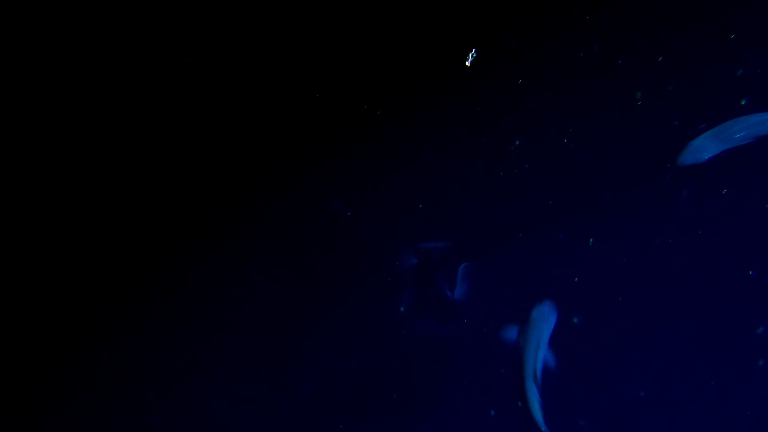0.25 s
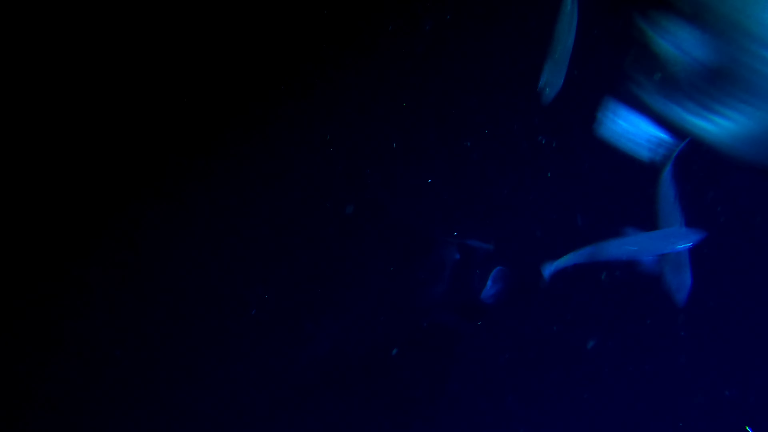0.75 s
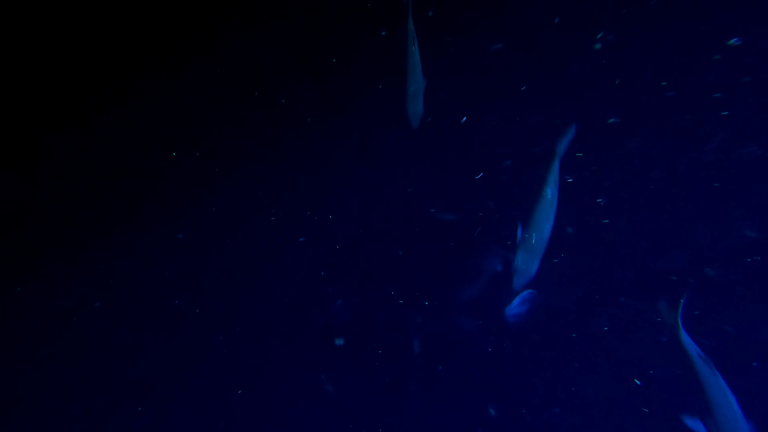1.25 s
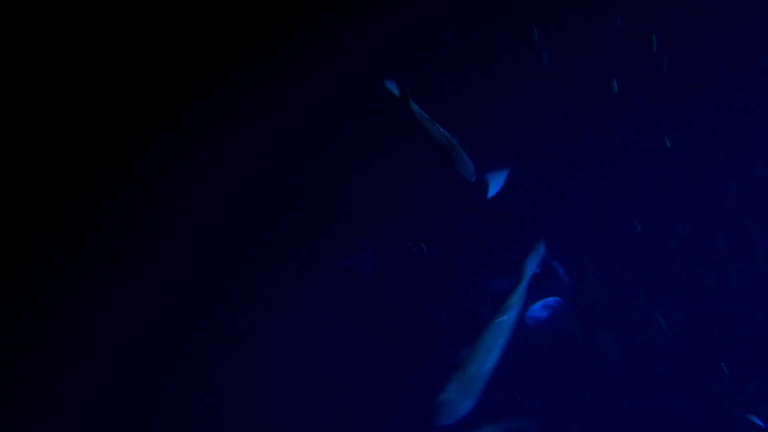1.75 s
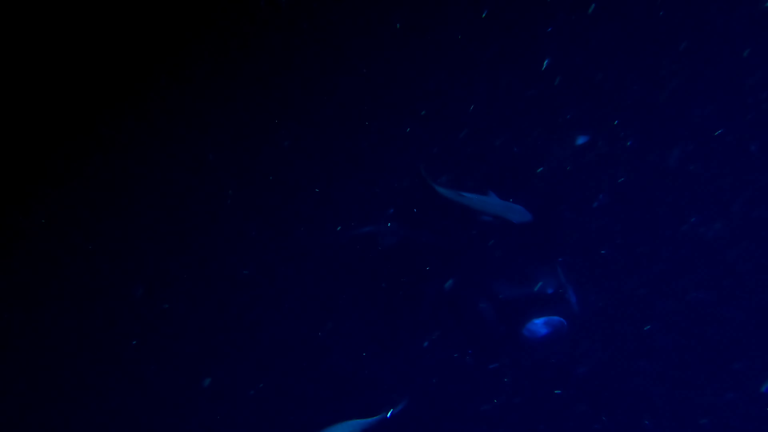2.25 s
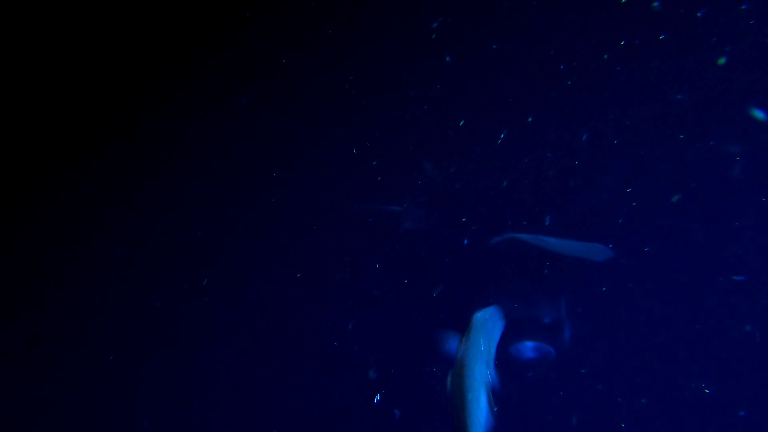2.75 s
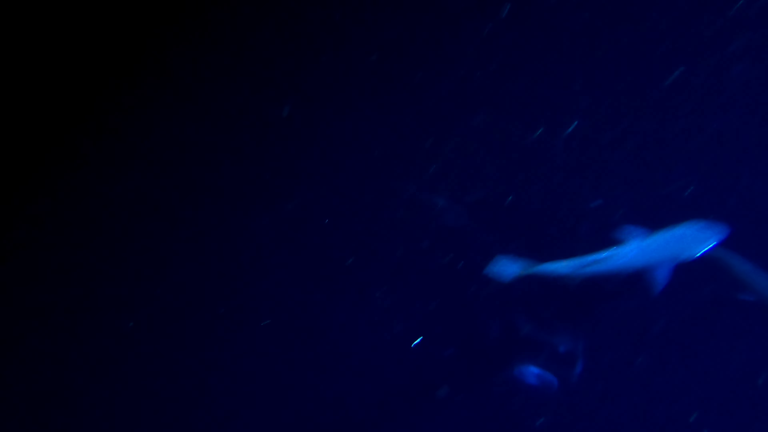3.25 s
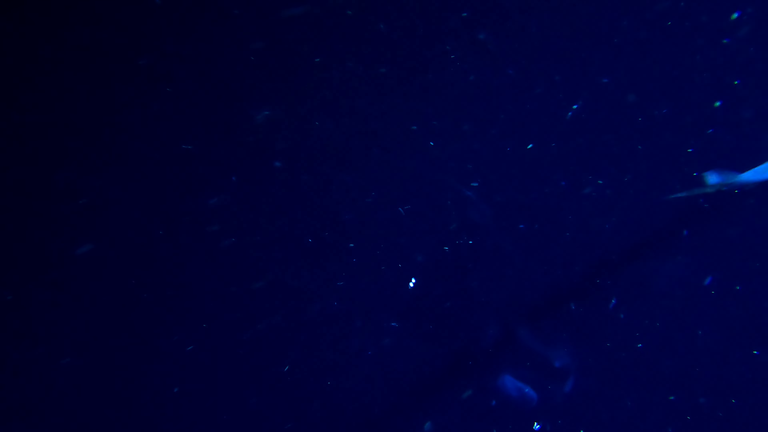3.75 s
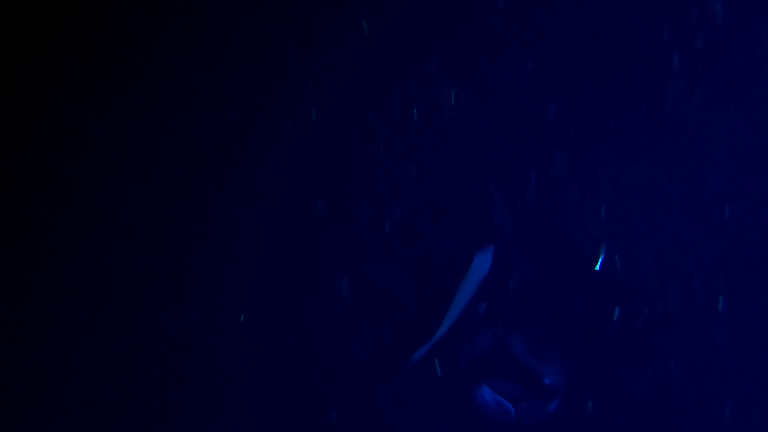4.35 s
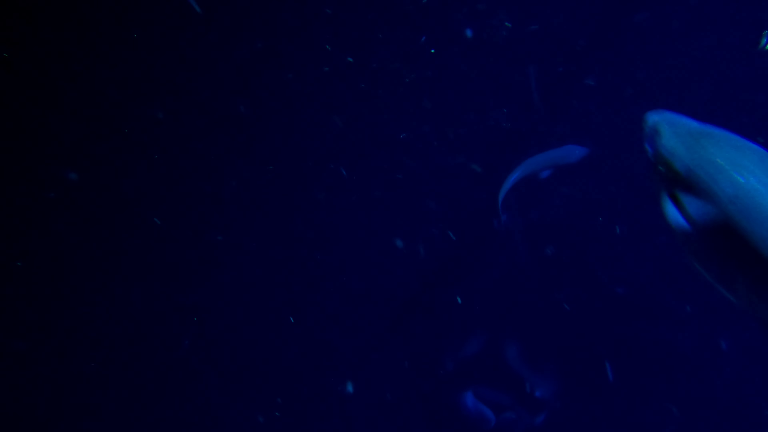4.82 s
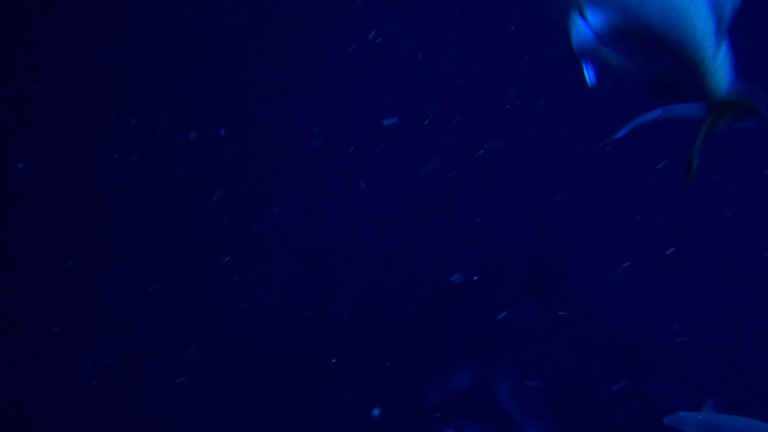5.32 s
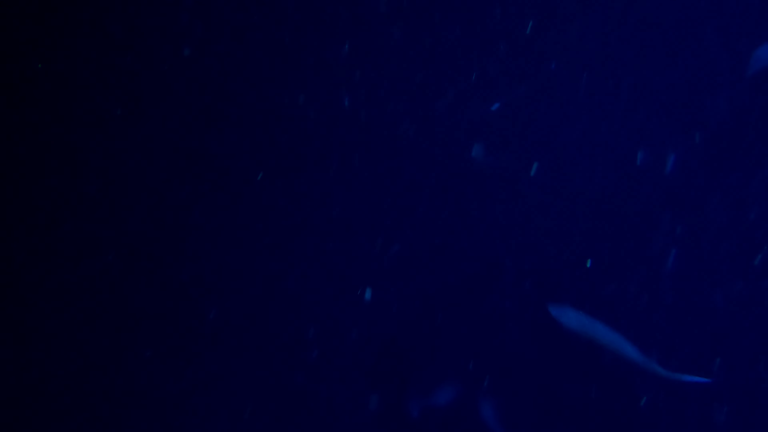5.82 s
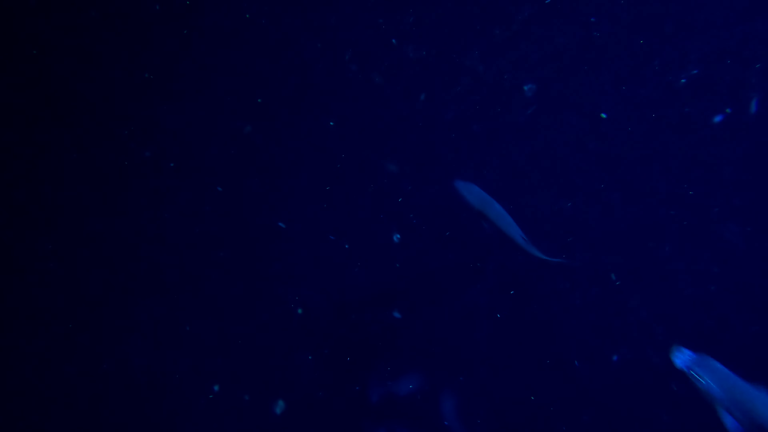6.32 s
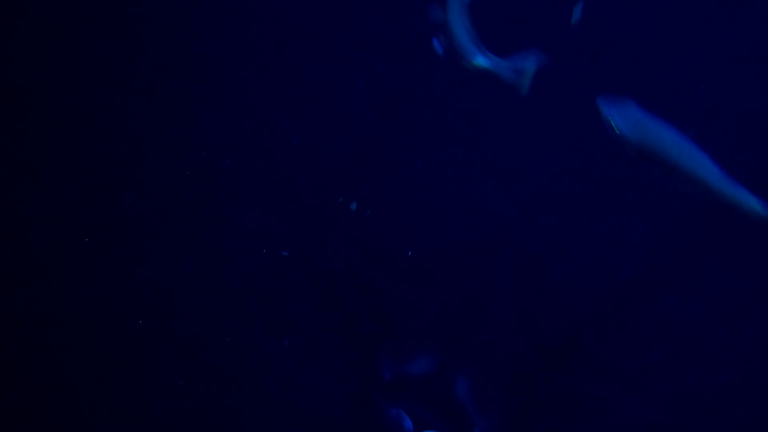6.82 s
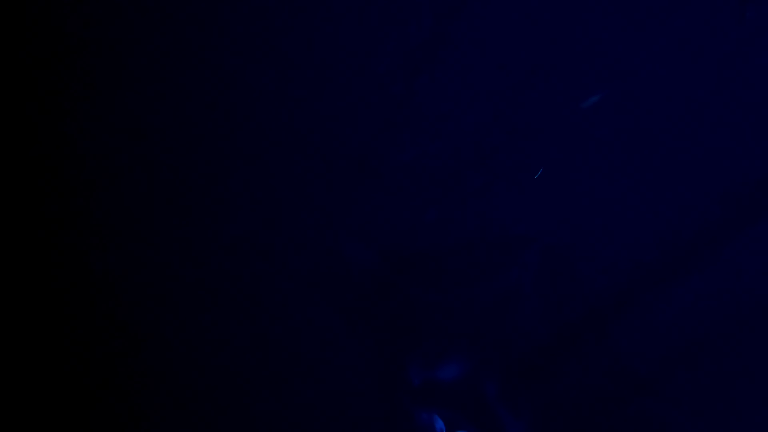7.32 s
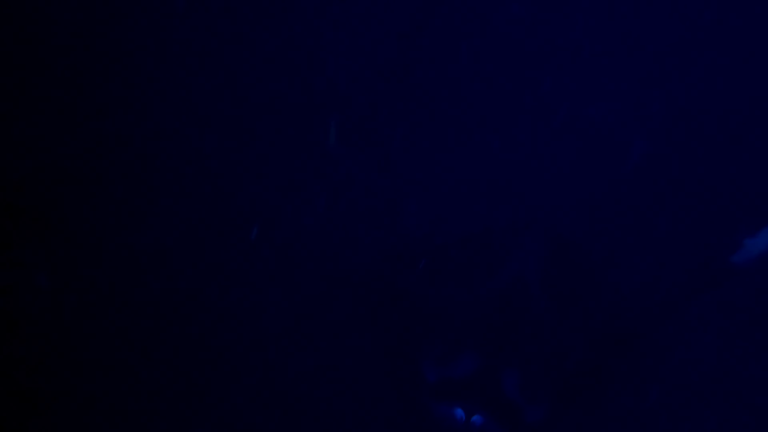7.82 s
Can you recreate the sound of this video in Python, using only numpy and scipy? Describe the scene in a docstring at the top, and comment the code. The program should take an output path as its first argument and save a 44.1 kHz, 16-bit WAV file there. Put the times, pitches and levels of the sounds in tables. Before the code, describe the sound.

Muffled motor drone and rushing wash beneath the sea, bubbles glugging past, then the engine's throbbing fizz turns brighter, hollow and wide.

```python
"""Boat engines heard under water by a diving camera: a drifting hum, a beating upper tone and fine clatter.
The hum is a sine on its own pitch path; overtones, whine and clatter are sines locked to the crank.
Shaped noise gives the steady propeller wash, the throbbing fizz, the hull drone and the rumble at the housing.
Bubbles glug and gurgle as short gliding tones; faint clicks, bursts of band noise, dot the treble.
After about 4.8 s the dull mono sound opens into a brighter, hollow stereo ring."""
import sys
import numpy as np
from scipy import signal
from scipy.fft import rfft, irfft, next_fast_len
from scipy.io import wavfile
from scipy.ndimage import uniform_filter1d, map_coordinates

SR = 44100
rng = np.random.default_rng(int(sys.argv[2]) if len(sys.argv) > 2 else 0)


def waveform_to_disk(signal):
    """Save audio, clipped to [-1, 1], as 16-bit WAV at the path in sys.argv[1]."""
    frames = np.transpose(np.atleast_2d(signal))
    scaled = np.clip(frames, -1, 1) * 32767
    samples = np.round(scaled).astype(np.int16)
    wavfile.write(sys.argv[1], SR, samples)


N = 356328
T = np.arange(N) / SR  # time [s]


def amp(db):
    """Decibels to gain."""
    return 10 ** (np.asarray(db) / 20)


def unit(x):
    """Scale to rms 1."""
    return x / np.sqrt(np.mean(x ** 2) + 1e-20)


def along(points, hz):
    """Read (frequency [Hz], value) points on a log frequency axis."""
    f, v = np.transpose(points)
    return np.interp(np.log(hz + 1), np.log(f + 1), v)


def curves(rows, t=T):
    """Each column after the time, joined by straight lines."""
    s, *cols = np.transpose(rows)
    return [np.interp(t, s, c) for c in cols]


def swells(rows):
    """Level in dB of smooth, bell-shaped swells and lulls."""
    return sum(db * np.exp(-((T - s) / half) ** 2) for s, db, half in rows)


def wobble(rate):
    """A smooth random curve, rate knots a second."""
    coarse = np.linspace(0, T[-1], 4096)
    knots = rng.standard_normal(size=1024)
    return np.interp(T, coarse, map_coordinates(knots, [coarse * rate], mode="wrap"))


def filtered(x, response):
    """x times a response of frequency."""
    m = next_fast_len(N + SR // 2)
    return irfft(rfft(x, m) * response(np.fft.rfftfreq(m, 1 / SR)), m)[..., :N]


def coloured(x, spectrum):
    """x with the given spectrum, at rms 1."""
    return unit(filtered(x, lambda hz: amp(along(spectrum, hz))))


def churn(patchy_db):
    """White noise with patches of random gain in time and pitch."""
    z = signal.stft(rng.standard_normal(N), nperseg=1024)[2]
    field = uniform_filter1d(rng.standard_normal(z.shape), size=4, axis=0)
    field = uniform_filter1d(field, size=7, axis=1)
    return unit(signal.istft(z * amp(patchy_db * unit(field)), nperseg=1024)[1][:N])


CYCLE_HZ = 27.17  # mean rate of the engine cycle
NEAR_S = 6.5  # time by which the boat is near


def partials(turns, orders, waver_db, smear):
    """Engine orders; shifting paths through the water make each waver in level and phase (smear in radians)."""
    total = 0
    for order, db in orders:
        level = amp(db + waver_db * wobble(5))
        phase = 2 * np.pi * (round(order) * turns + rng.random()) + smear * wobble(4)
        total = total + level * np.sin(phase)
    return np.sqrt(2) * total


# moments when the two engines fall in step: (time [s], level of the upper tone before trim [dB])
IN_STEP = [(3.33, -30), (3.9, -27), (4.25, -29.5), (4.58, -26), (4.87, -30), (5.15, -30), (5.4, -27.5),
           (5.67, -27), (5.92, -26), (6.181, -26.5), (6.5, -25), (6.75, -26), (7.0, -24), (7.229, -20),
           (7.47, -27), (7.75, -26.5), (8.011, -23.5)]
UPPER_GROWTH_DB_PER_S = 3.5  # growth of the upper tone up to the first of these moments
BEAT_HZ, BEAT_SHARE = 3.4, 0.65  # beat rate outside the listed moments; second engine's amplitude ratio


def beating(turns, upper_db=-1.0):
    """The upper tone of two engines: the second runs slightly flat, so the pair falls in step once a beat."""
    times = np.transpose(IN_STEP)[0]
    before, after = np.minimum(T - times[0], 0), np.maximum(T - times[-1], 0)
    slip = np.interp(T, times, np.arange(len(times))) + BEAT_HZ * (before + after)
    level_db = upper_db + curves(IN_STEP)[0] + UPPER_GROWTH_DB_PER_S * before
    phase = 2 * np.pi * 7 * turns
    pair = np.sin(phase) + BEAT_SHARE * np.sin(phase - 2 * np.pi * slip)
    return np.sqrt(2) * amp(level_db) * pair


# the hum grows as the boat nears, then swells and drifts: (time [s], pitch [Hz], level before trim [dB])
HUM_PATH = [(0, 159.1, -40), (2.65, 159.3, -30), (2.88, 159.9, -20), (3.06, 159.9, -21.5),
            (3.27, 159, -28.5), (3.55, 161, -24.5), (3.85, 160.5, -23.5), (4.08, 161.1, -16),
            (4.24, 160.9, -24), (4.38, 161.2, -17.5), (4.53, 161, -26), (4.67, 161.2, -17.5),
            (4.8, 161.8, -25.5), (4.97, 163.4, -15.5), (5.12, 164.5, -23), (5.25, 164.6, -20),
            (5.37, 164.8, -26.5), (5.6, 162.4, -24), (5.75, 161.8, -21), (6.14, 162, -20),
            (6.3, 163.2, -16.5), (6.73, 161.8, -24.5), (6.88, 161.9, -19), (7.05, 161.1, -27),
            (7.23, 163.3, -19.5), (7.42, 164.7, -25), (7.62, 164.6, -19), (7.9, 163.4, -18.5),
            (8.08, 162.3, -21)]
# the engine's whine: (time [s], level before trim [dB])
WHINE_LEVEL = [(0, -29.5), (1.2, -26), (2.2, -31.5), (2.8, -34), (4.8, -35), (6.5, -30.5), (8.08, -34)]
# overtones: (multiple of the engine cycle, level once the boat is near [dB], growth until then [dB/s])
OVERTONES = [(8, -43, 0), (12, -42, 1.5), (14, -35.5, 2.5), (15, -39, 1), (21, -42, 1.5), (27, -43.5, 2),
             (30, -44.5, 0.5)]
# clatter lines: (multiple of the engine cycle, level before the shared clatter level [dB])
CLATTER_LINES = [(39, -55), (40, -59.5), (41, -60), (42, -59.5), (44, -60), (46, -55.5), (48, -60),
                 (50, -59), (53, -66), (54, -67), (58, -66.5), (60, -64), (61, -67.5), (71, -70.5),
                 (72, -70.5), (74, -66.5), (75, -67), (78, -69), (79, -68.5), (81, -70.5)]
CLATTER_DB, CLATTER_GROWTH_DB_PER_S = 1.1, 0.3  # shared clatter level at NEAR_S, and its steady growth


def engine(turns, hum_db=-0.95, whine_db=-3.5):
    """A hum drifting on its own and a beating upper tone; overtones, whine and clatter locked to the crank."""
    pitch_hz, level_db = curves(HUM_PATH)
    hum = np.sqrt(2) * amp(level_db + hum_db) * np.sin(2 * np.pi * np.cumsum(pitch_hz) / SR)
    approach = np.minimum(T - NEAR_S, 0)
    growing = [(order, db + growth * approach) for order, db, growth in OVERTONES]
    overtones = partials(turns, growing, waver_db=1.3, smear=.18)
    whine = partials(turns, [(17, 0)], waver_db=1, smear=.3)
    whine = amp(curves(WHINE_LEVEL)[0] + whine_db) * whine
    clatter = partials(turns, CLATTER_LINES, waver_db=2, smear=.3)
    clatter = amp(CLATTER_DB + CLATTER_GROWTH_DB_PER_S * (T - NEAR_S)) * clatter
    return hum + beating(turns) + overtones + whine + clatter


# colour of the propeller wash: (frequency [Hz], relative level [dB])
WASH_COLOUR = [(150, -34.5), (260, -11.5), (318, -7.5), (377, -7.5), (452, -1.5), (490, -5.5), (527, -1.5),
               (607, 0), (811, -7.5), (880, -13.5), (1300, -27), (1690, -60.5), (2860, -120)]
# swells and lulls of the wash: (time of the peak [s], change [dB], half length [s])
WASH_CHANGES = [(.4, 2.5, 0.39), (1.25, 2.5, 0.43), (2.15, -1.5, 0.23), (2.8, 1.5, 0.49), (4.05, 1, 0.22),
                (4.5, -2.5, 0.093), (4.73, 3.5, 0.063), (5.27, 2.5, 0.077), (5.5, -2.5, 0.062),
                (5.87, -2, 0.092), (7.3, 0.5, 0.44)]
WASH_DB = -25.5  # level between the swells


def propeller_wash():
    """The steady propeller wash: patchy noise in a mid-low band."""
    return amp(WASH_DB + swells(WASH_CHANGES)) * coloured(churn(patchy_db=1.69), WASH_COLOUR)


# narrow resonances of the camera housing: (centre [Hz], width [Hz], lift [dB])
HOUSING_MODES = [(1370, 63, 4.5), (1970, 70, 2), (3220, 58, 2), (3400, 90, -3.5), (3600, 80, 5),
                 (4420, 100, 2), (4570, 50, -4), (4760, 110, 2), (5130, 170, -3), (5700, 250, 0.5),
                 (6400, 200, -2.5)]


def housing(hz):
    """Gain of the housing's narrow resonances."""
    return amp(sum(db * np.exp(-((hz - centre) / width) ** 2) for centre, width, db in HOUSING_MODES))


# colour of the fizz: (frequency [Hz], relative level [dB])
FIZZ_COLOUR = [(300, -63.5), (900, -16.5), (1150, 2), (1290, 1), (1450, 1), (1630, -1), (1820, -5.5),
               (2070, -3.5), (2330, -9), (2850, -12.5), (3250, -19), (3600, -20.5), (4100, -23.5),
               (4500, -29.5), (4800, -31), (5200, -32.5), (5750, -34), (6500, -39.5), (9000, -49.5),
               (12000, -95.5)]
# cavitation fizz: (time [s], level before trim [dB])
FIZZ_LEVEL = [(0, -51), (2.2, -51.5), (3.4, -50.5), (4.35, -56), (4.65, -54), (4.92, -51.5), (5.3, -51.5),
              (6.65, -52.5), (6.9, -52), (7.5, -52), (8.08, -51.5)]
# how the sound opens, also played by widen():
# (time [s], openness [0 mono to about 1], ring [dB], hollow frequency [Hz])
OPENING_PATH = [(4.74, 0, -4, 1260), (4.88, 0.039, 4, 1180), (5.05, 0.15, 11.5, 1065),
                (5.25, 0.15, 10.5, 1010), (5.75, 0.39, 13, 922), (6.58, 0.66, 13, 844),
                (6.95, 0.87, 1.5, 860), (8.08, 0.98, -3, 873)]


def cavitation(turns, repeat=.75, comb=0.89, throb=0.24, flutter_db=0.92, trim_db=4.5):
    """Fizz that throbs with the firings; part of it repeats from one engine cycle to the next."""
    firing = np.cos(4 * np.pi * turns) + np.cos(8 * np.pi * turns)  # two and four a cycle
    memory = np.clip(repeat, 0, .95)

    def recur(hz):
        """Feedback delay of one engine cycle, at unchanged power."""
        return np.sqrt(1 - memory ** 2) / (1 - memory * np.exp(-2j * np.pi * hz / CYCLE_HZ))

    repeating = filtered(rng.standard_normal(N), recur)
    fizz = (churn(patchy_db=1.5) + comb * repeating) * (1 + throb * firing / 2)
    fizz = coloured(fizz, FIZZ_COLOUR)
    # the housing colours the fizz less and less as the sound opens
    openness = np.clip(curves(OPENING_PATH)[0], 0, 1)
    heard = openness * fizz + (1 - openness) * filtered(fizz, housing)
    return amp(curves(FIZZ_LEVEL)[0] + trim_db + flutter_db * wobble(25)) * heard


# lower and upper resonance of the hull drone: (frequency [Hz], relative level [dB])
DRONE_LOW_COLOUR = [(40, -47), (80, -19.5), (105, -6), (122, -2.5), (135, 0), (150, -4), (170, -7.5),
                    (220, -22.5), (500, -120)]
DRONE_HIGH_COLOUR = [(60, -67.5), (140, -16), (175, -6), (200, 0), (224, 2), (265, -13), (340, -23),
                     (500, -43), (1200, -120)]
# booms and lulls of the lower resonance: (time of the peak [s], change [dB], half length [s])
DRONE_CHANGES = [(1.8, 2, .25), (2.45, -4.5, 0.2), (3.3, -2.5, .25), (4.22, 8, 0.09), (4.73, 7.5, 0.099),
                 (5.6, -3.5, 0.055)]
DRONE_LOW_DB, DRONE_FADE_DB_PER_S = -24, 0.86  # lower: level at the start before booms, slow recession
DRONE_FLUTTER_DB = 0.7  # unrest of the lower resonance
DRONE_HIGH_DB = -23.5  # upper: level at its loudest
DRONE_PEAK_S, DRONE_PASS_S = 2.9, 2.5  # upper: loudest then, 3 dB weaker this long before and after


def hull_drone():
    """The rough drone of a hull passes slowly: noise in two low resonances."""
    low_db = DRONE_LOW_DB - DRONE_FADE_DB_PER_S * T + swells(DRONE_CHANGES) + DRONE_FLUTTER_DB * wobble(7)
    low = amp(low_db) * coloured(churn(patchy_db=1), DRONE_LOW_COLOUR)
    nearness = 1 / np.hypot(1, (T - DRONE_PEAK_S) / DRONE_PASS_S)
    high = amp(DRONE_HIGH_DB) * nearness * coloured(churn(patchy_db=0.0), DRONE_HIGH_COLOUR)
    return low + high


# colour of the flow rumble, also played by buffet(): (frequency [Hz], relative level [dB])
RUMBLE_COLOUR = [(7, -24), (17, 0.5), (28, -2), (39, -1.5), (60, -7), (85, -13), (120, -16.5), (200, -33.5),
                 (500, -120)]
# surges of water against the housing, also in buffet(): (time of the peak [s], rise [dB], half length [s])
FLOW_SURGES = [(1.8, 6, 0.18), (2.13, 3, 0.072), (2.82, 7, 0.1), (3.25, 1.5, 0.23), (4.15, 11, .07),
               (5.38, 8, 0.13), (6.64, 8.5, 0.14), (7.15, 7.5, 0.068)]
FLOW_DB, FLOW_FLUTTER_DB = -28, 2  # rumble between surges, and its unrest


def flow_rumble():
    """Water surges and rumbles against the housing, right at the microphone: deep patchy noise."""
    flow_db = FLOW_DB + swells(FLOW_SURGES) + FLOW_FLUTTER_DB * wobble(7.2)
    return amp(flow_db) * coloured(churn(patchy_db=1.3), RUMBLE_COLOUR)


# clusters of small bubbles: (time [s], level before trim [dB], pitch [Hz], half length [s])
GURGLE_EVENTS = [(0.192, -26.5, 596, .04), (0.33, -27.5, 600, .04), (0.59, -28, 330, .025),
                 (0.599, -22, 600, .035), (1.1, -24.5, 565, .035), (1.239, -26.5, 538, .04),
                 (1.46, -22, 553, .025), (1.842, -23, 585, .035), (2.352, -28, 698, .025),
                 (2.669, -26.5, 692, .04), (2.838, -23.5, 632, .025), (2.921, -23, 692, .03),
                 (3.33, -24, 270, .02), (3.39, -25, 429, .035), (3.496, -23.5, 593, .025),
                 (3.81, -22.5, 469, .03), (3.94, -21, 591, .04), (3.96, -26, 340, .03),
                 (4.105, -19, 614, .025), (4.318, -26.5, 677, .025), (4.721, -22.5, 600, .045),
                 (5.013, -27.5, 748, .03), (5.29, -37.5, 1250, .012), (5.297, -23.5, 602, .03),
                 (5.239, -28.5, 372, .08), (5.59, -35, 611, .02), (6.166, -27, 703, .025),
                 (6.346, -21.5, 602, .025), (6.67, -29.5, 330, .12), (7.005, -27.5, 714, .035),
                 (7.621, -31.5, 664, .04), (7.869, -25, 540, .04), (8.029, -32, 659, .05)]


def gurgles(count=14, pitch_spread=.11, cycles=16, rise=.06, trim_db=-2.5):
    """Each gurgle is a cluster of bubbles that start softly, ring briefly and rise a little in pitch."""
    out = np.zeros(N)
    for s, db, hz, half in GURGLE_EVENTS:
        near = abs(T - s) < half + .08
        when = s + half * rng.triangular(-1, 0, 1, size=(count, 1))
        pitch = hz * np.exp(pitch_spread * rng.standard_normal(size=(count, 1)))
        # age in runs of `cycles` periods; each bubble is loudest at age 0.2
        age = np.clip((T[near] - when) * pitch / cycles + .2, 0, None)
        ringing = np.sin(2 * np.pi * cycles * age * (1 + rise * age / 2))
        cluster = np.sum(age * np.exp(-5 * age) * ringing, axis=0)
        rms = np.sqrt(np.sum(cluster ** 2) / (2 * half * SR))
        out[near] += amp(db + trim_db) * cluster / rms
    return out


# sharp clicks and splashes: (time [s], level before trim [dB], decay by 60 dB [s], centre [Hz])
CLICK_EVENTS = [(0.236, -54, .02, 2870), (1.127, -59.5, 0.013, 4900), (1.178, -53, .025, 2970),
                (1.285, -52, .025, 4700), (1.402, -51, .015, 4400), (1.95, -56.5, .02, 3880),
                (3.205, -59, .015, 3950), (3.815, -52, .025, 2690), (4.63, -56, 0.018, 3900),
                (5.17, -57, 0.01, 4100), (5.205, -53, 0.024, 4200), (5.31, -59.5, .02, 4600),
                (5.404, -53.5, 0.014, 4500), (5.673, -56.5, 0.016, 3800), (6.039, -58, 0.022, 5300),
                (6.873, -47.5, 0.15, 2900), (7.105, -59, 0.039, 4200), (7.41, -61, 0.056, 4500),
                (7.79, -59.5, .03, 4600)]


def clicks(crackle_db=-82, spread_db=13, tiny_t60=.02, tiny_hz=4500, width_octaves=0.44, trim_db=-6):
    """Faint, bright snaps in the water, decaying band noise: a few clear ones among many tiny ones."""
    out, t = np.zeros(N + SR), np.arange(SR // 5) / SR
    hz = np.fft.rfftfreq(len(t), 1 / SR) + 1
    tiny = [(when * N / SR, crackle_db + spread_db * size ** 2, tiny_t60, tiny_hz)
            for when, size in rng.random(size=(90, 2))]
    for s, db, t60, centre in [*CLICK_EVENTS, *tiny]:
        band = np.exp(-(np.log2(hz / centre) / width_octaves) ** 2)
        snap = unit(irfft(rfft(rng.standard_normal(len(t))) * band, len(t)))
        out[round(s * SR):][:len(t)] += amp(db + trim_db - 60 * t / t60) * snap
    return out[:N]


# large bubbles:
# (time of the peak [s], level before trim [dB], pitch at the peak [Hz], swell [s], glide [octaves/s])
GLUG_EVENTS = [(0.582, -6, 170, 0.0019, -9), (.617, -11.5, 229, 0.0077, 5), (0.85, -17, 308, 0.012, 2),
               (.895, -11, 325, 0.0073, 6), (1.84, -16.5, 102, 0.035, -2), (3.221, -10.5, 193, 0.0034, 3.5),
               (3.319, -10.5, 226, 0.0096, -8), (3.326, -12, 323, 0.0083, -1), (3.486, -6, 283, 0.004, 5),
               (4.109, -20.5, 135, 0.031, 7), (4.231, -12, 121, 0.083, -3), (5.314, -1.5, 69.6, 0.0048, -2),
               (5.4, -14, 36, .04, 0), (5.72, -15, 684, 0.038, 1.5), (5.872, -18, 95, 0.093, 3),
               (7.5, -25.5, 703, 0.064, -1.5), (7.74, -27, 706, 0.092, 0.8)]


def glugs(trim_db=-3.5):
    """Large bubbles swell and fade at their own gliding pitch."""
    out = np.zeros(N)
    for s, db, hz, swell, glide in GLUG_EVENTS:
        near = abs(T - s) < 4 * swell
        t = T[near] - s
        tone = np.cos(2 * np.pi * hz * t * 2 ** (glide * t / 2))
        out[near] += amp(db + trim_db) * np.exp(-(t / swell) ** 2) * tone
    return out


# colour of each side at openness 1: (frequency [Hz], gain [dB])
LEFT_COLOUR = [(180, -1.5), (280, -1.5), (400, -3), (680, -2), (850, -3), (1000, 1), (1300, 22), (1600, 20),
               (2150, 18), (2500, 12), (3050, 19.5), (3400, 13.5), (4400, 26.5), (5150, 21), (5600, 15),
               (7000, 23), (9000, 17.5)]
RIGHT_COLOUR = [(180, -0.5), (280, -2), (400, -3), (590, 2), (675, 15.5), (780, 9), (950, 9.5),
                (1300, 20.5), (1600, 16.5), (1850, 11.5), (2150, 14), (2450, 7), (3050, 10.5), (3450, 5.5),
                (4400, 11), (5600, 0), (7000, 1), (9000, -6.5)]
# phase between the sides when fully apart: (frequency [Hz], lead of the left [rad])
LEFT_LEAD = [(170, .08), (330, .3), (520, .9), (700, 1.7), (830, 2.5), (900, -2.2), (1300, -1.9),
             (2500, -1.5), (4300, -1.3), (5400, 0)]
# resonances that come with the opening: (centre [Hz], width [Hz], share of the ring)
RING_MODES = [(654, 120, 0.091), (1198, 145, 0.94), (2120, 260, 0.22), (2970, 83, 0.21), (4440, 200, 0.36),
              (7040, 690, 0.54)]


def widen(x, hollow_db=13, hollow_width_hz=90, right_parts_at=0.15):
    """The sides drift apart: both brighten and ring; a hollow slides down, on both, then only on the left."""
    hz, t, z = signal.stft(x, SR, nperseg=1024, noverlap=768)
    openness, ring_db, hollow_hz = curves(OPENING_PATH, t)
    openness, hz = np.clip(openness, 0, None), hz[:, None]

    def bell(centre, width):
        """Bell over frequency."""
        return np.exp(-((hz - centre) / width) ** 2)

    # the nearest resonance and the phase flip between the sides slide down with the hollow
    slide = (hollow_hz - hollow_hz[-1]) * bell(hollow_hz, 420)
    ring = ring_db * sum(share * bell(centre + 0.24 * slide, width) for centre, width, share in RING_MODES)
    hollow = hollow_db * np.tanh(18 * openness) * bell(hollow_hz, hollow_width_hz)
    right_hollow = hollow * np.exp(-(openness / right_parts_at) ** 2)
    # the phases part soonest around the hollow; each side takes half the lead
    apart = np.tanh(openness * (2 + 13 * bell(hollow_hz, 300)))
    turn = np.exp(.5j * apart * along(LEFT_LEAD, abs(hz - slide)))
    left = z * amp(openness * along(LEFT_COLOUR, hz) + ring - hollow) * turn
    right = z * amp(openness * along(RIGHT_COLOUR, hz) + ring - right_hollow) / turn
    return signal.istft(np.array([left, right]), SR, nperseg=1024, noverlap=768)[1][:, :N]


def buffet(buffet_db=-13):
    """Once the sides are apart, a little of the flow rumble differs between them."""
    eddies = np.array([coloured(churn(patchy_db=0.5), RUMBLE_COLOUR) for side in range(2)])
    return amp(FLOW_DB + swells(FLOW_SURGES) + buffet_db) * curves(OPENING_PATH)[0] * eddies


EDGE_S = .006  # fade at both ends


def scene():
    """One nearly steady crank paces upper tone, overtones, whine, clatter and fizz; the hum drifts on its own."""
    turns = np.cumsum(CYCLE_HZ * (1 + 0.00078 * wobble(1.5))) / SR
    fade = np.sin(np.pi / 2 * np.clip(np.minimum(T, T[-1] - T) / EDGE_S, 0, 1)) ** 2
    boats = engine(turns) + propeller_wash() + cavitation(turns) + hull_drone()
    sea = boats + flow_rumble() + gurgles() + clicks() + glugs()
    return widen(fade * sea) + fade * buffet()


TOP_HZ = 9700  # band limit of the camera


def record(dry):
    """The camera keeps nothing above its band limit."""
    return filtered(dry, lambda hz: hz < TOP_HZ)


dry = scene()
out = record(dry)
waveform_to_disk(out)
```